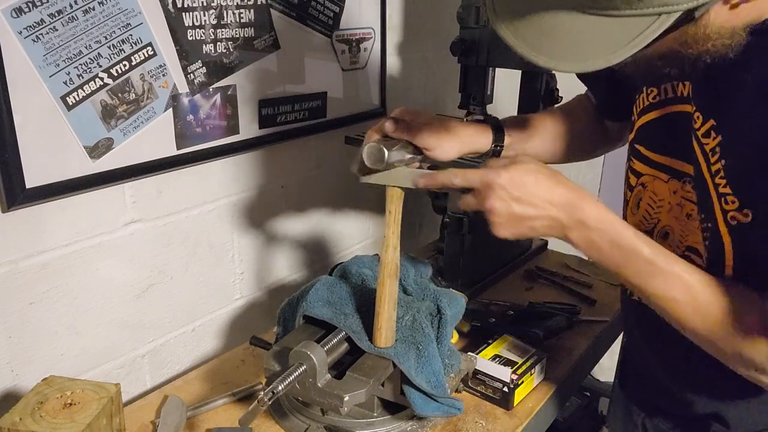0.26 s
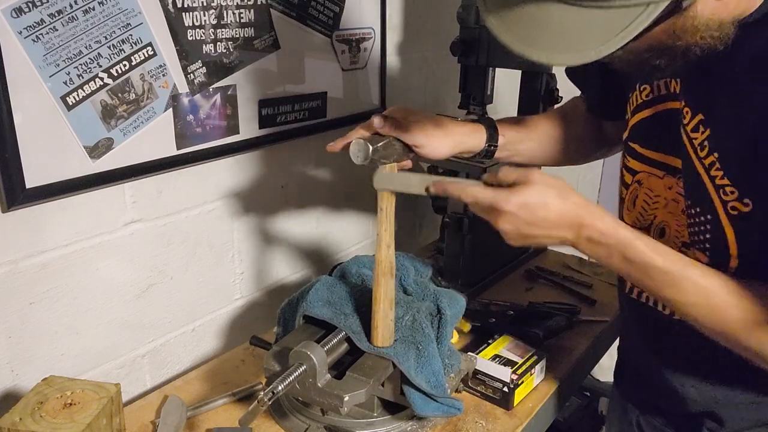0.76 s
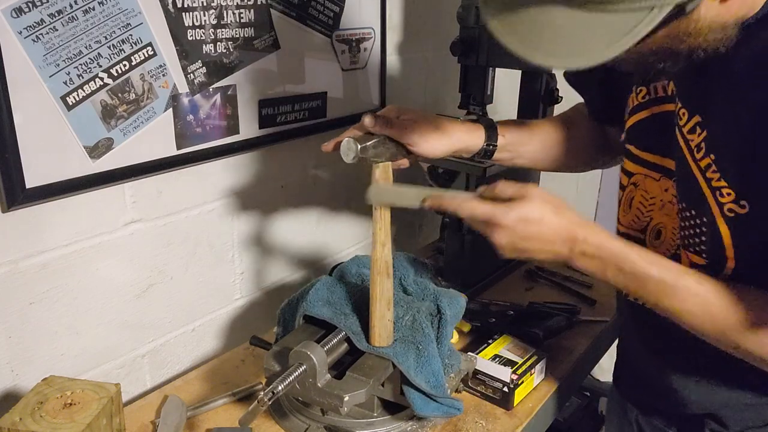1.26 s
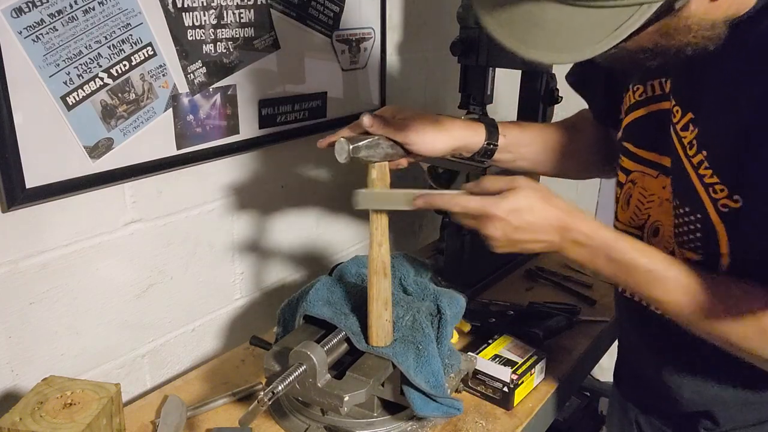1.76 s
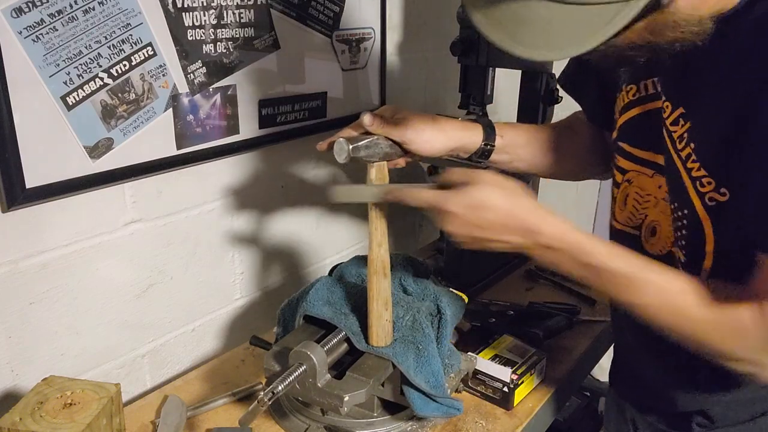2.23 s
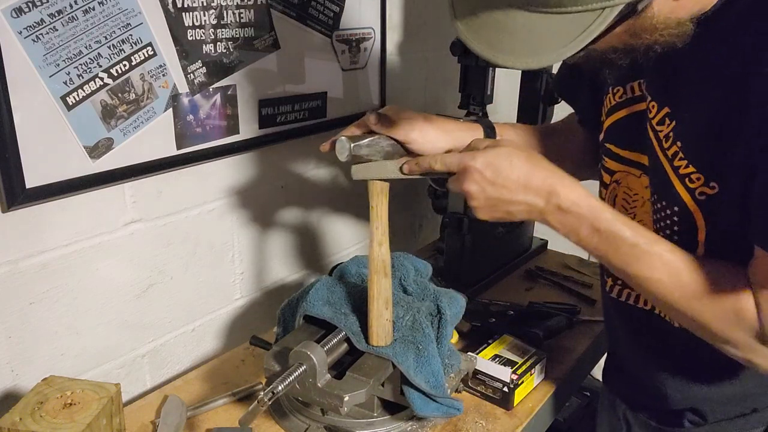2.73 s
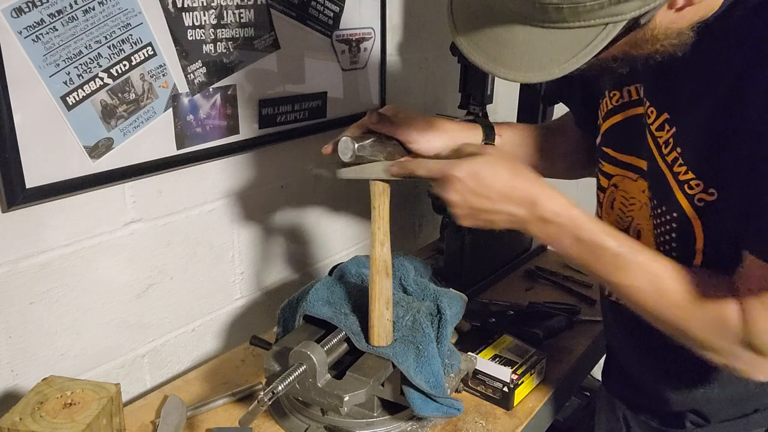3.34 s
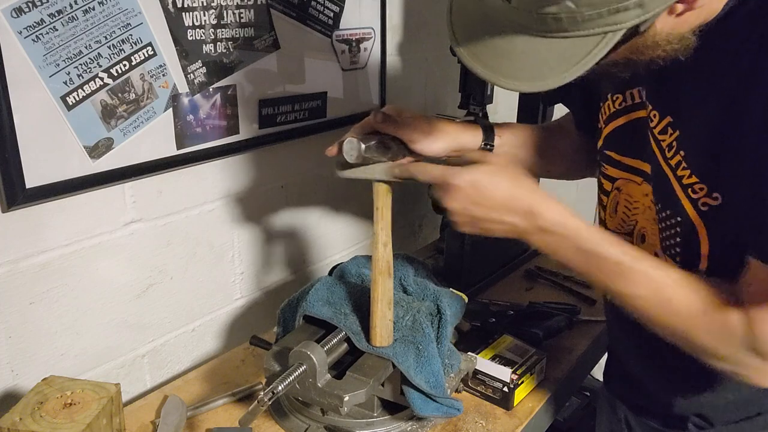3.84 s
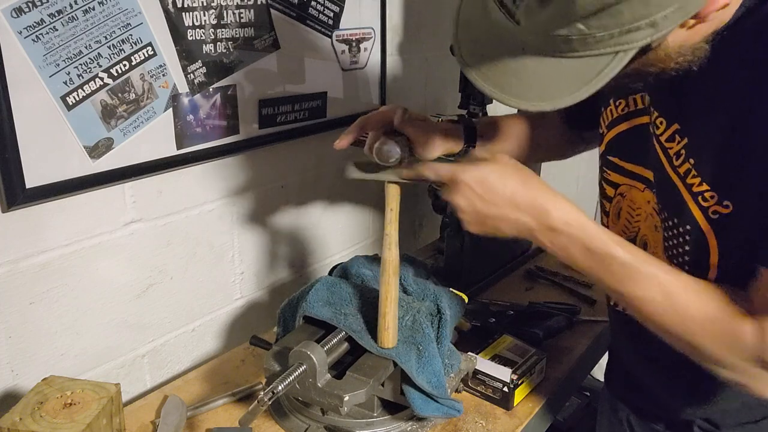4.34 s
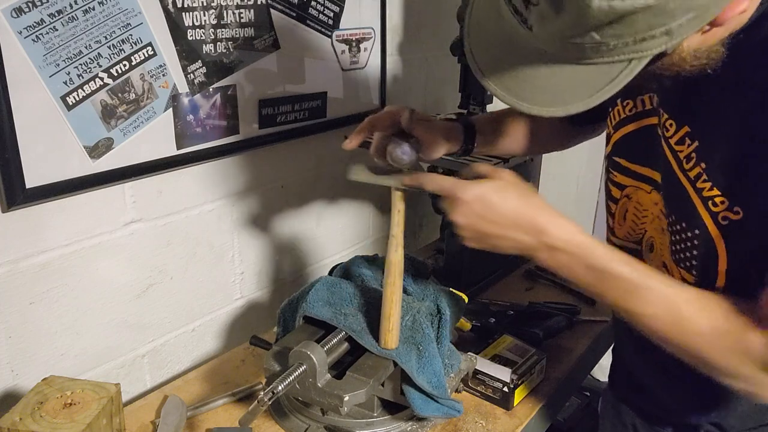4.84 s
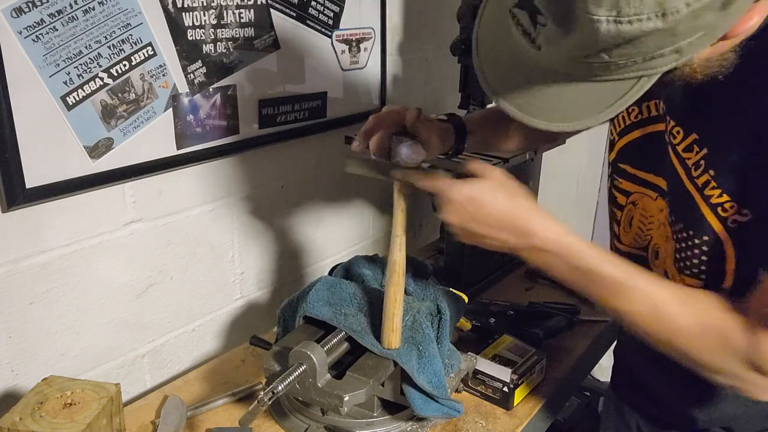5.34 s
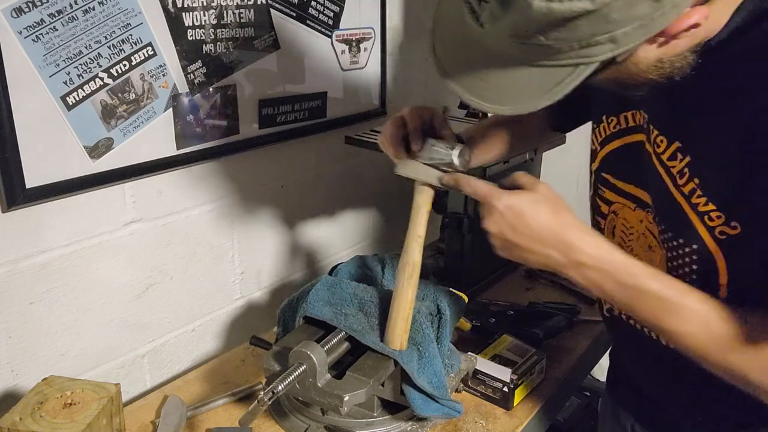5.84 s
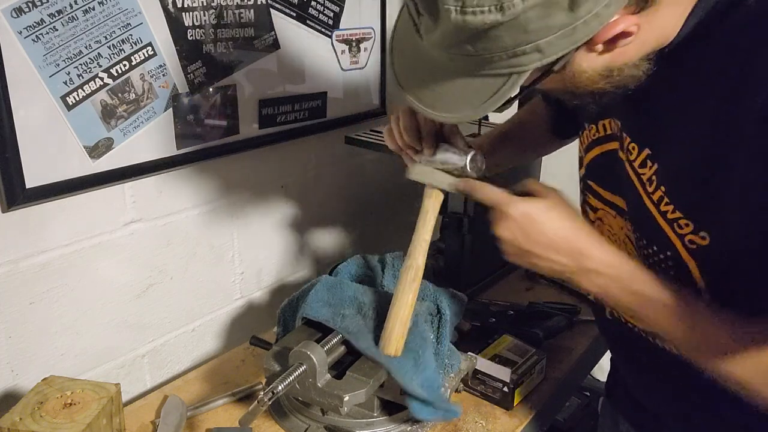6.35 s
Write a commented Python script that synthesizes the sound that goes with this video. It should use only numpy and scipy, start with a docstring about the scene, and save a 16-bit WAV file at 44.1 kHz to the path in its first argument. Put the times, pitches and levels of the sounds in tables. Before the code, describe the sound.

Short rough rasping strokes tear at wood about twice a second, with light blade clacks and a faint low hum behind.

```python
"""A small hard-walled workshop: a steel rasp is pushed in short strokes over a wooden handle gripped in a vise.
The blade taps the wood as it lands, then its teeth tear fibres; noise and clicks ring modes of blade and handle.
A growl follows the passing tooth rows, filtered noise makes the fibre hiss, and a faint high whistle slips in once.
Behind the work lie air noise, an appliance hum, the low rumble of the house and dull bumps through the floor."""
import sys
import numpy as np
from scipy import signal
from scipy.fft import rfft, irfft, next_fast_len
from scipy.io import wavfile
from scipy.ndimage import uniform_filter1d

SR = 44100
rng = np.random.default_rng(int(sys.argv[2]) if len(sys.argv) > 2 else 0)


def wav_out(sig):
    """Save sig, one row per channel (or a flat mono array), as 16-bit PCM at SR to the path in sys.argv[1]."""
    wavfile.write(sys.argv[1], SR, np.round(np.clip(np.atleast_2d(sig).T, -1, 1) * 32767).astype(np.int16))


N = 290619

# Landings of the blade on the wood; knock and crack count from the blow, all levels before each part's trim:
# (time [s], blow [dB], handle knock [dB], crack [dB], blade modes struck best [Hz], handle modes struck best [Hz])
LANDINGS = [(0.1886, -35.5, -3, -36, 2530, 1280), (0.2259, -51.5, 4, -16, 2570, 1420),
            (0.869, -32.5, -2, -41, 2400, 1260), (0.927, -22.5, -16.5, -25.5, 2570, 1299),
            (1.4447, -40, -0.5, -34, 3300, 1260), (1.491, -27.5, -13, -20.5, 2560, 1400),
            (1.9468, -33.5, -2.5, -35, 4860, 1510), (2.0243, -22, -53.5, -19, 4238, 1310),
            (2.411, -33.5, 10.5, -15, 3230, 1590), (2.523, -21, -12, -12, 4330, 1380),
            (2.856, -67, -16, -33, 3210, 1302), (3.3129, -44, 2, -38, 3000, 1400),
            (3.3592, -31.5, -8, -23.5, 3960, 1350), (3.836, -42.5, 4.5, -22, 3240, 1350),
            (3.887, -31.5, -3, -23.5, 4456, 1400), (4.308, -49, 6, -50, 3240, 1300),
            (4.4255, -14.5, -34, -20, 6738, 1380), (4.8528, -27.5, -7.5, -11.5, 3802, 1253),
            (5.291, -25, -8, -24, 3650, 1101), (5.7877, -58, 5, -18, 2444, 1600),
            (5.836, -32, -4.5, -23.5, 3200, 1301), (5.8491, -24, -38, -15, 2650, 1250),
            (6.0382, -41.5, 4.5, -19.5, 3182, 1340), (6.3718, -28, -10.5, -20.5, 2570, 1330)]


def amp(db):
    """Turns dB into gain."""
    return 10 ** (np.asarray(db) / 20)


def evened(x):
    """Scales to rms 1."""
    return x / np.sqrt(np.mean(x ** 2) + 1e-20)


def read(points, hz):
    """Reads a table of (frequency [Hz], value) on a log-frequency axis."""
    f, value = np.transpose(points)
    return np.interp(np.log(hz + 1), np.log(f + 1), value)


def coloured(x, points):
    """Causal minimum-phase filter with the shape of a dB spectrum, scaled to unit energy."""
    log_gain = np.log(amp(read(points, abs(np.fft.fftfreq(4096, 1 / SR)))))
    spectrum = np.exp(np.conj(signal.hilbert(log_gain)))
    taps = np.fft.ifft(spectrum).real[:2048]
    return signal.oaconvolve(x, taps / np.linalg.norm(taps))[:N]


def ring(x, hz, width):
    """One mode with steep skirts (a double pole); white noise of rms 1 comes out near rms 1."""
    r = np.exp(-np.pi * width / SR)
    pole = r * np.exp(2j * np.pi * hz / SR)
    gain = 2 * (1 - r) * np.sqrt(1 - r ** 2)
    return gain * signal.lfilter([1], np.poly([pole, pole]), x).imag


def drift(per_s):
    """Slow chance about zero: per_s random values a second (rms 1), joined by straight lines."""
    knots = rng.standard_normal(int(N / SR * 100) + 2)
    return np.interp(np.arange(N) / SR * per_s, np.arange(len(knots)), knots)


def rasp():
    """Tooth rows and landings shake blade and handle, while the cut growls and the fibres hiss and crack."""
    push = push_controls()
    cut_db, growl_db, hiss_db, rows_hz, _, _ = push
    # one turn for each row of teeth, at an uneven speed
    turn = 2 * np.pi * np.cumsum(rows_hz * (1 + 0.03144 * drift(50))) / SR
    teeth = tooth_force(turn)
    out = ringing_bodies(push, teeth)
    out += growl(cut_db, growl_db, turn) + torn_fibres(cut_db, hiss_db, teeth)
    return signal.sosfilt(signal.butter(2, 150, "high", fs=SR, output="sos"), out)


def push_controls():
    """Each push swells to full pressure, then eases off and slows; the strongest push at each moment leads."""
    # One push a row; growl, hiss and knock count from the cut, before each part's trim:
    # (start [s], rise [s], fall [s], first cut [dB], full cut [dB], growl [dB], fibre hiss [dB],
    #  handle knock [dB], blade tilt [dB per octave], tooth rows at the start [Hz], at full pressure [Hz])
    strokes = [(0.204, 0.3, 0.091, -64, -40.5, -9.5, -2, -9, -7, 365, 302),
               (0.883, .16, 0.094, -63.5, -32, -18.5, -3, -11.5, -3, 341.7, 323),
               (1.451, .15, 0.11, -56, -35, -14.5, -4, -14.5, 5.5, 346, 362),
               (1.96, .17, 0.11, -50.5, -39, -13.5, -3.5, -11, 1.5, 344.9, 340),
               (2.854, 0.064, 0.14, -60, -37.5, -7, 1.5, -8, -1.5, 348, 352),
               (3.32, 0.18, 0.12, -61.5, -38.5, -7, -1.5, -9, -4.5, 332, 360),
               (3.852, 0.15, 0.1, -62, -40.5, -8.5, -0.5, -11, -1, 371, 364),
               (4.361, 0.077, .11, -75.5, -41.5, -14, 1.5, -9.5, -2.5, 344.4, 330),
               (4.53, 0.044, 0.091, -60.5, -49, -10.5, -6, -8.5, -1.5, 299.8, 277),
               (4.873, 0.1105, 0.0894, -62, -39, -12, -1.5, -2, 1.5, 209.5, 423),
               (5.373, 0.053, 0.14, -58.5, -34.5, -17.5, 1, -12, 0.5, 291, 450),
               (5.854, 0.017, 0.16, -51, -51, -24, 0.5, -10, -3, 319, 370),
               (6.028, 0.029, .06, -60.5, -62, -1.5, -2, -9, -3, 389.4, 320),
               (6.38, .15, 0.061, -45.5, -38.5, -13, -3, -9, -3, 290.2, 288)]
    touch_s, lift_db = 0.012, -38  # the level climbs 60 dB in touch_s before the start; drop by the end of the fall
    rise_bend, fall_bend = 1.135, 2.1
    # dB the growl gains (rise, fall) and the hiss loses on the cut for each dB under full pressure
    growl_leads, growl_stays, hiss_thins = 0.1, 0.57, 0.23
    slowing = 0.25  # share of its speed the blade loses as it eases off

    t, out = np.arange(N) / SR, np.zeros((6, N))
    out[0], out[3] = -120, 340  # lifted blade: cut [dB], tooth rows [Hz]
    for start, rise, fall, first_db, full_db, growl_db, hiss_db, knock_db, tilt, first_hz, full_hz in strokes:
        up = np.clip((t - start) / rise, 0, 1)
        down = np.maximum((t - start - rise) / fall, 0)
        cut_db = full_db + (first_db - full_db) * (1 - up) ** rise_bend + lift_db * down ** fall_bend
        cut_db -= 60 * np.maximum(start - t, 0) / touch_s
        under_db = np.minimum(full_db - cut_db, 30)
        growl_now_db = growl_db + np.where(down > 0, growl_stays, growl_leads) * under_db
        hiss_now_db = hiss_db - hiss_thins * under_db
        times = [start, start + rise, start + rise + fall]
        rows_hz = np.interp(t, times, [first_hz, full_hz, full_hz * (1 - slowing)])
        row = np.broadcast_arrays(cut_db, growl_now_db, hiss_now_db, rows_hz, knock_db, tilt)
        out = np.where(cut_db > out[0], row, out)
    return out


def tooth_force(turn):
    """Uneven fibres give way in random kicks over fine noise; each passing tooth row swells the force."""
    kicks_per_s, chatter_db = 2500, 3.2  # chatter: how unevenly the blade presses
    size = amp(1.72 * np.minimum(rng.exponential(1, N), 5))
    bite = size * (rng.random(N) < kicks_per_s / SR) * rng.choice([-1., 1.], N)
    force = evened(bite + 0.12 * rng.standard_normal(N))
    return force * amp(chatter_db * drift(80) + 2.73 * np.cos(turn))


def blows(db, late_s=0.):
    """A one-sample click for every landing, late_s after it."""
    clicks = np.zeros(N)
    clicks[np.round((np.array(LANDINGS)[:, 0] + late_s) * SR).astype(int)] = amp(db)
    return clicks


def ringing_bodies(push, teeth):
    """Resonances driven by rub and landings; the sliding contact favours now one mode, now another."""
    # Modes of the low sway, the handle, the blade and the blade's tip, width before the grip and level before trim:
    # (frequency [Hz], width [Hz], level [dB])
    sway = [(173.6, 19, -6), (350, 130, 2)]
    handle = [(1020, 247, -12), (1293, 118, -13.5), (1373.3, 46, -9.5), (1567, 200, -13)]
    blade = [(2613, 59, -13), (3209, 27, -13), (3525, 1040, -1.5), (3639, 14, -16.5), (3586, 120, -16.5),
             (4349, 36, -14), (5434, 1100, -1.5), (5586, 30, -7), (5674, 180, -7), (6665, 13, -17)]
    tip = [(9043, 130, 1.5), (10880, 260, 0.5), (12250, 350, 1), (13490, 450, 4.5)]
    grip_hz = 40  # the hands widen every mode by this much
    slide_db, luck_db, side_db = 3.5, 2.5, 3.0  # spread of a mode along a stroke, blow to blow, to each side

    cut_db, growl_db, hiss_db, _, knock_db, tilt = push
    _, blow_db, tap_knock_db, crack_db, struck_hz, knocked_hz = np.transpose(LANDINGS)
    bodies = (  # modes, rub [dB], landing [dB]
        (sway, growl_db - 5.0, 0.54 * tap_knock_db + 2),
        (handle, knock_db + 1.5, tap_knock_db + 23),
        (blade, -8, 15.5),
        (tip, hiss_db - 29.0, crack_db + 19))
    out = np.zeros((2, N))
    for modes, rub_db, hit_db in bodies:
        stifled = 2.5 if modes is handle else 1.2  # a landing widens the modes, the wood's most
        for hz, width, db in modes:
            rub_level_db = cut_db + rub_db + slide_db * drift(12)
            strike_db = blow_db + hit_db + luck_db * rng.standard_normal(len(LANDINGS))
            if modes is blade:
                rub_level_db = rub_level_db + tilt * np.log2(hz / 4200)
                strike_db = strike_db - 10.8 * abs(np.log2(hz / struck_hz)) - 0.97 * np.log2(width / 60)
            if modes is handle:
                strike_db = strike_db - 25 * abs(np.log2(hz / knocked_hz))
            late = rng.random((2, len(LANDINGS)))
            landing = blows(strike_db, 0.0027 * late[0])
            bounce = blows(strike_db - 7.0, 0.0031 + 0.0095 * late[1])
            rubbed = ring(teeth * amp(rub_level_db), hz, width + grip_hz)
            struck = ring(landing + bounce, hz, stifled * width + grip_hz)
            # the moving blade radiates each mode its own way; the sway stays central
            lean_db = side_db * drift(5) * (modes is not sway)
            out += amp(db + np.array([lean_db, -lean_db])) * (rubbed + struck)
    return out


def growl(cut_db, growl_db, turn):
    """The tooth-row rate and its octave, as an unsteady tone."""
    unsteady = 1 + 0.56 * drift(40)
    return amp(cut_db + growl_db - 1.9) * unsteady * (np.sin(turn) + 0.29 * np.sin(2 * turn))


def torn_fibres(cut_db, hiss_db, teeth):
    """Tearing hisses along the cut and cracks at each landing, both as noise through one spectrum."""
    # Shape of the fibre noise: (frequency [Hz], relative level [dB per Hz])
    fibres = [(450, -15.5), (700, 2), (1900, -19.5), (3500, -12), (7000, 3.5), (8500, 10.5), (9800, -3.5),
              (11000, 8), (14000, 8), (16000, 4.5)]
    _, blow_db, _, crack_db, _, _ = np.transpose(LANDINGS)
    fall, rise = np.exp(-1 / (np.array([0.007, 0.0008]) * SR))  # time constants [s]
    crack = signal.lfilter([1 - rise], np.poly([fall, rise]), blows(blow_db + crack_db + 4.5))
    dust = rng.standard_normal(N)  # fine hiss heard alike on both sides
    ears = []
    for _ in range(2):
        own_dust = 1.1 * rng.standard_normal(N)
        hiss = amp(cut_db + hiss_db - 4) * evened(teeth + 2.5 * (dust + own_dust))
        ears.append(coloured(hiss + crack * rng.standard_normal(N), fibres))
    return np.array(ears)


def squeak():
    """A faint fuzzy whistle: slow noise on a tone that ends in a fall."""
    # Path of the whistle: (time [s], level [dB], frequency [Hz])
    path = [(4.56, -83, 14060), (4.621, -78, 14200), (4.7, -81, 12230), (4.792, -88.5, 10840)]
    s, db, hz = np.transpose(path)
    t = np.arange(N) / SR
    fuzz = evened(uniform_filter1d(rng.standard_normal(N), 150))
    phase = 2 * np.pi * np.cumsum(np.interp(t, s, hz)) / SR
    return amp(np.interp(t, s, db, -150, -150)) * fuzz * np.sin(phase)


def walls(x):
    """Sparse echoes of random sign, each band dying at its own speed."""
    # Decay of the workshop: (frequency [Hz], time to fall 60 dB [s])
    decay = [(250, 0.32), (1500, 0.15), (5000, 0.14), (14000, 0.13)]
    taps = np.zeros((2, SR // 2))
    slots = np.arange(120, SR // 2 - 20, 20)  # one echo in every 20 samples
    at = slots + rng.integers(0, 20, (2, len(slots)))
    np.put_along_axis(taps, at, rng.choice([-1., 1.], at.shape), 1)
    hz, t, z = signal.stft(taps, SR, nperseg=256)
    tail = signal.istft(z * amp(-60 * t / read(decay, hz)[:, None]), SR, nperseg=256)[1]
    # the walls give back little bass
    tail = signal.sosfilt(signal.butter(2, 420, "high", fs=SR, output="sos"), tail)
    return signal.oaconvolve(x, tail / np.linalg.norm(tail[0]), axes=1)[:, :N]


def room_tone():
    """All that lies behind the work: air, hum, rumble and bumps."""
    return air_noise() + hum() + rumble() + thumps()


def air_noise():
    """Steady noise shaped in short frames, with the low end more alike left and right."""
    # Shape of the air noise: (frequency [Hz], relative level [dB per Hz])
    air = [(35, -36.5), (60, 6), (124, -4), (207, -9.5), (363, -11.5), (593, -15), (749, -17),
           (1860, -25.5), (5720, -32), (9790, -47), (16000, -40.5)]
    # Left-right likeness: (frequency [Hz], likeness [0-1])
    likeness = [(60, 0.91), (300, 0.8), (1000, .5), (4000, 0)]
    level_db = -65
    frames, hz = N // 512 + 5, np.fft.rfftfreq(2048, 1 / SR)
    a, b, c, d = rng.standard_normal((4, len(hz), frames))
    same = read(likeness, hz)[:, None]
    left, other = a + 1j * b, c + 1j * d
    right = same * left + np.sqrt(1 - same ** 2) * other
    z = np.array([left, right]) * amp(read(air, hz))[:, None]
    return amp(level_db) * evened(signal.istft(z, nperseg=2048, noverlap=1536)[1][:, :N])


def hum():
    """The appliance: steady tones that waver a little in level and pitch."""
    # Tones of the appliance, about which they waver: (frequency [Hz], level [dB])
    tones = [(82, -74.5), (120, -67.5)]
    out = np.zeros(N)
    for hz, db in tones:
        phase = 2 * np.pi * np.cumsum(hz + 2.5 * drift(21)) / SR
        out += amp(db + 0.93 * drift(4.4)) * np.sqrt(2) * np.sin(phase)
    return out


def rumble():
    """The house: noise ringing near 38 Hz, swelling slowly and almost alike on both sides."""
    level_db = -66.5  # swells about this
    both, apart = (evened(ring(rng.standard_normal(N), 38, 20)) for _ in range(2))
    return (both + 0.208 * np.array([apart, -apart])) * amp(level_db + 5.7 * drift(3.1))


def thumps():
    """Each dull bump through the floor is a few 40 Hz cycles that swell and die away."""
    # Bumps, level before the envelope: (time [s], level [dB])
    bumps = [(1.05, -52), (1.738, -40), (1.85, -46.5), (3.609, -48), (5.982, -51.5), (6.371, -50)]
    t, out = np.arange(SR // 4) / SR, np.zeros(N + SR)
    envelope = np.exp(1 - t / 0.026) * t / 0.034
    bump = np.sqrt(2) * np.sin(2 * np.pi * 40 * t) * envelope
    for s, db in bumps:
        first = round(s * SR)
        out[first:first + len(t)] += amp(db) * bump
    return out[:N]


def scene():
    """The work reaches the left microphone first, then the walls answer over the room tone."""
    # Lean of the work between the microphones: (frequency [Hz], left minus right [dB])
    lean_table = [(60, 1), (240, -1), (950, 3.5), (3770, 0.5), (15000, 0.5)]
    lead_s = 55e-6  # left ahead of right
    work = rasp() + squeak()
    size = next_fast_len(N)
    hz = np.fft.rfftfreq(size, 1 / SR)
    lean = amp(read(lean_table, hz) / 2) * np.exp(1j * np.pi * hz * lead_s)  # half to each side
    direct = irfft(rfft(work, size) * np.array([lean, 1 / lean]), size)[:, :N]
    return direct + amp(-3.5) * walls(work) + room_tone()


def record(dry):
    """A steep low-pass at 15.9 kHz limits the band."""
    low_pass = signal.firwin(255, 15900, window=("kaiser", 9), fs=SR)
    return signal.oaconvolve(dry, low_pass[None], "same")


dry = scene()
out = record(dry)
wav_out(out)
```